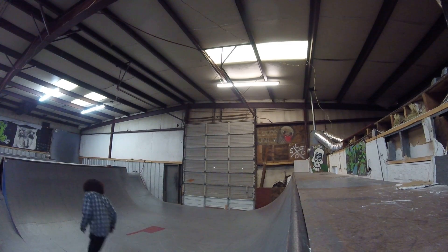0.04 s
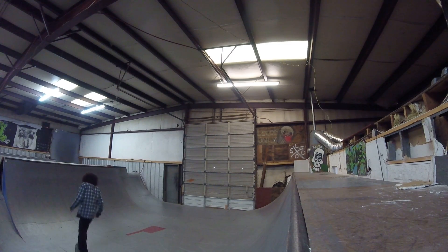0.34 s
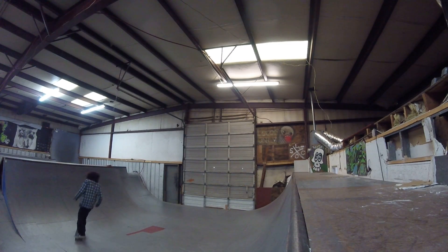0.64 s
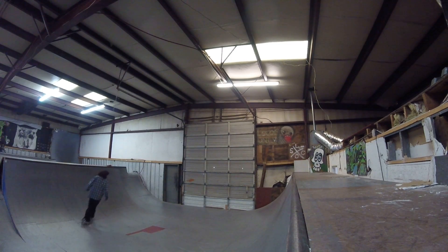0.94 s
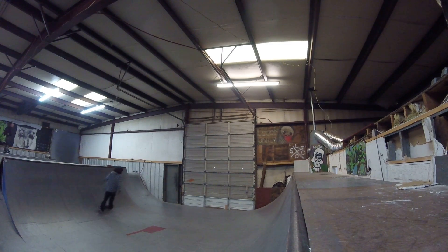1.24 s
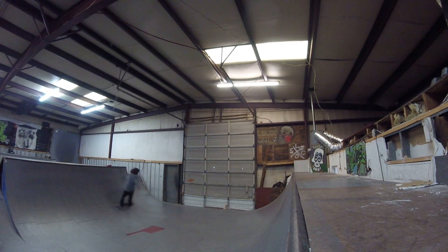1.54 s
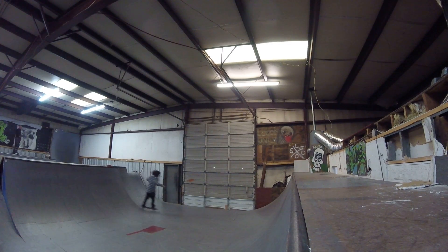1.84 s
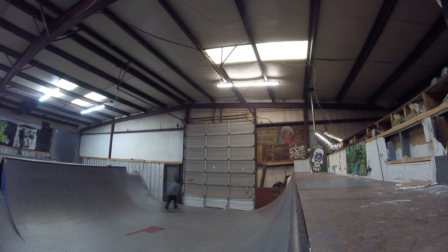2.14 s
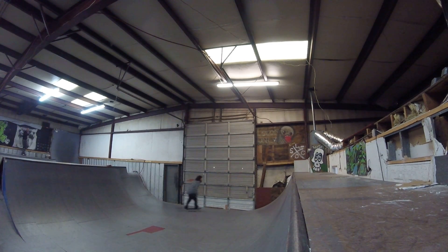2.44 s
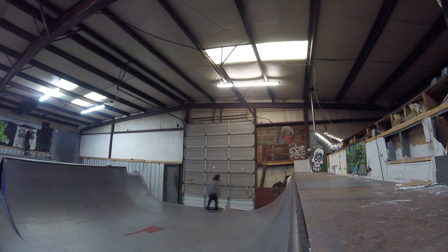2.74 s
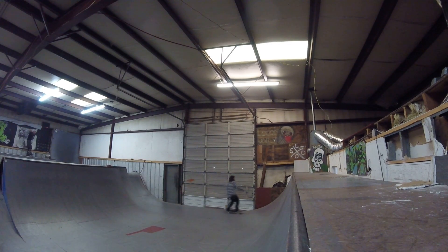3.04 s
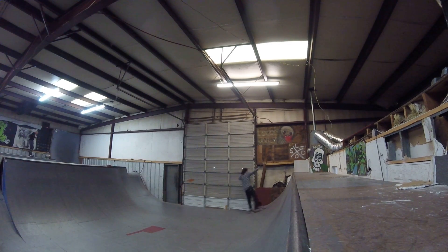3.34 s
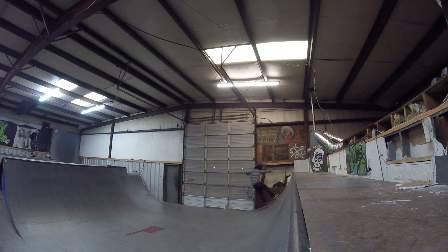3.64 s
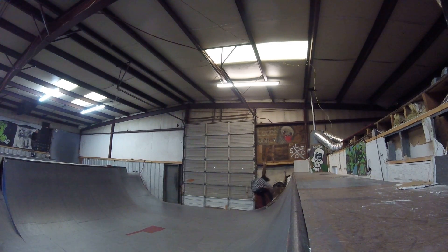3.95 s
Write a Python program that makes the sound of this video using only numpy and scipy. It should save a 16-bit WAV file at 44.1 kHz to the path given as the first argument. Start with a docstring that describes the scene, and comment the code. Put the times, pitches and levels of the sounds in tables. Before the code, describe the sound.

A skateboard rolls on a hollow wooden ramp in an echoing hall, its low rumble strongest at the start, with gritty wheels, faint bearing hiss and soft thuds. At about 2 seconds the board slaps down loudly and the wood booms. From 3 seconds come more knocks, light metallic ticks and two tiny squeaks, while the ramp's drone swells around 3.5 seconds and fades by 4.

```python
"""A steel-roofed hall, where a skateboard rolls across a hollow wooden ramp.
The wheels grind over grit, their bearings hiss, and the ramp rumbles and booms underneath.
Panel seams thud, rough spots clack, and the plywood thumps as it flexes under the rider.
Halfway the board slaps down on the floor, and deck, ramp and hall ring. On the way up
the far slope the curved plywood drones, the trucks tick and their bushings squeak."""
import sys
import numpy as np
from scipy import signal
from scipy.fft import rfft, irfft
from scipy.io import wavfile

SR = 44100
rng = np.random.default_rng(int(sys.argv[2]) if len(sys.argv) > 2 else 0)


def materialize(psi):
    """Save the field psi as 16-bit PCM at rate SR to the path in sys.argv[1].

    A 1-D psi becomes a single channel; in a 2-D psi each row is a channel.
    """
    bounded = np.clip(np.atleast_2d(psi).T, -1, 1)
    quanta = np.round(bounded * 32767).astype(np.int16)
    wavfile.write(sys.argv[1], SR, quanta)


N = 176400


def from_db(db):
    """Decibels to gain."""
    return 10 ** (np.asarray(db) / 20)


def rms_one(x):
    """Scale to rms 1."""
    return x / np.sqrt(np.mean(x ** 2) + 1e-20)


def fader(rows):
    """Gain over time from (time_s, level_db) points."""
    return from_db(np.interp(np.arange(N) / SR, *np.transpose(rows)))


def at_hz(points, hz):
    """Read a table on a log-frequency axis."""
    freqs, values = np.transpose(points)
    return np.interp(np.log(np.maximum(hz, 1)), np.log(freqs), values)


def eq(x, points):
    """Minimum-phase EQ with the given curve, scaled to unit power gain."""
    size = 2 * N
    gain = rms_one(from_db(at_hz(points, np.arange(N + 1) * SR / size)))
    cepstrum = irfft(np.log(gain))[:N]
    cepstrum[1:] *= 2
    return irfft(rfft(x, size) * np.exp(rfft(cepstrum, size)))[:N]


def drift(rate_hz):
    """Slow random modulation with a spread of 1."""
    hop, settle = 40, 2000
    pole = np.exp(-2 * np.pi * rate_hz * hop / SR)
    noise = rng.standard_normal(N // hop + settle + 2)
    slow = signal.lfilter([1], [1, -2 * pole, pole * pole], noise)[settle:]
    return np.interp(np.arange(N) / hop, np.arange(len(slow)), rms_one(slow))


def grains(per_s, spread_db):
    """Random clicks of uneven size, rms 1."""
    sizes = from_db(spread_db * np.minimum(rng.exponential(1, N), 4))
    signs = rng.choice([-1, 1], N)
    return rms_one(sizes * signs * (rng.random(N) < per_s / SR))


def crack(t60_s, rise_s):
    """A fast-dying noise burst of unit energy."""
    t = np.arange(1, SR // 4) / SR
    burst = rng.standard_normal(len(t)) * from_db(-60 * t / t60_s) * (1 - np.exp(-t / rise_s))
    return burst / np.linalg.norm(burst)


def ringing(start_s, hz, db, t60_s, rise_s):
    """A struck mode that swells briefly and dies away."""
    t = np.maximum(np.arange(N) / SR - start_s, 0)
    attack = 1 - np.exp(-(t / rise_s) ** 2)
    return attack * from_db(db - 60 * t / t60_s) * np.sin(2 * np.pi * hz * t)


def hits(cues, one_shot):
    """Trigger a fresh one-shot at each cue's time and level."""
    track = np.zeros(N + 2 * SR)
    for start_s, db, *_ in cues:
        sound, start = one_shot(), int(start_s * SR)
        track[start:start + len(sound)] += from_db(db) * sound
    return track[:N]


# Reverb decay of the hall: freq_hz, t60_s
HALL_DECAY = [(100, 1), (400, 0.74), (900, 0.6), (1600, 1.03), (3000, 1.24), (5500, 1.2), (8000, 0.63),
              (12000, 0.58)]

def hall_response():
    """Diffuse echoes that build up briefly and die at their own rate in each band; unit energy."""
    t, hz = np.arange(SR) / SR, np.arange(SR // 2 + 1)
    white, tail = rfft(rng.standard_normal(SR)), 0
    for band_hz, t60_s in HALL_DECAY:
        band = at_hz([(f, f == band_hz) for f, _ in HALL_DECAY], hz)
        tail += irfft(white * band) * from_db(-60 * t / t60_s)
    tail *= 1 - np.exp(-t / 0.0081)
    return tail / np.linalg.norm(tail)


def in_hall(x, hall, wet_db):
    """Direct sound plus its reverb."""
    return x + from_db(wet_db) * signal.fftconvolve(x, hall)[:N]


# Tone of the hall's air: freq_hz, gain_db
AIR_EQ = [(30, 1.5), (150, -30.5), (600, -21), (3000, -25.5), (7000, -26.5), (10000, -42.5), (14000, -52)]

def room_tone():
    """The still air of the hall, a faint bed of noise."""
    return from_db(-52.5) * eq(rng.standard_normal(N), AIR_EQ)


# Fader ride of the grind: time_s, level_db
GRIND_FADER = [(0, -35.5), (.14, -41.5), (.4, -44.5), (.7, -45.5), (.84, -41.5), (1.05, -41.5),
               (1.3, -44.5), (1.55, -45.5), (1.6, -42.5), (1.69, -42), (1.78, -44), (1.94, -44.5),
               (2.35, -50.5), (2.55, -43), (2.85, -45.5), (3.1, -46), (3.35, -39), (3.55, -44), (3.72, -49),
               (3.82, -55.5), (4, -56)]
# Tone of the wheels: freq_hz, gain_db
WHEEL_EQ = [(150, -34.5), (300, 6), (520, 0), (1000, -2), (1500, -4), (2200, -8.5), (3100, -12),
            (4200, -26.5), (8000, -48.5)]

def wheel_grind(hall):
    """Grit crushed under the wheels over a smooth grind whose level flutters."""
    grit = 0.48 * in_hall(grains(per_s=900, spread_db=2), hall, wet_db=-4)
    smooth = rng.standard_normal(N) / 2
    flutter = from_db(1.45 * drift(rate_hz=10.6))
    return rms_one(eq(grit + smooth, WHEEL_EQ)) * fader(GRIND_FADER) * flutter


# Fader ride of the bearings: time_s, level_db
BEARING_FADER = [(0, -43), (.2, -53), (.6, -60), (.95, -55), (1.14, -51), (1.25, -57.5), (1.45, -56.5),
                 (1.7, -52.5), (1.94, -57.5), (2.4, -67), (2.72, -51.5), (3, -68.5), (3.15, -51.5),
                 (3.68, -74), (3.82, -77), (4, -59)]
# Their bright tone: freq_hz, gain_db
BEARING_EQ = [(2000, -4), (3500, -2), (5300, -1.5), (6200, -3.5), (6550, 3), (7000, -9.5), (9000, -18),
              (10700, -37.5), (14000, -33.5)]

def bearing_hiss():
    """Balls rattle in the hissing bearings."""
    rattle = 0.6 * grains(per_s=250, spread_db=3)
    hiss = rng.standard_normal(N)
    return rms_one(eq(rattle + hiss, BEARING_EQ)) * fader(BEARING_FADER)


# Fader ride of the panels under the rider's weight: time_s, level_db
RUMBLE_FADER = [(0, -20), (.25, -30), (.45, -32), (.68, -41), (.9, -33.5), (1.06, -25), (1.2, -31.5),
                (1.4, -28.5), (1.9, -34.5), (2.3, -33), (2.85, -32.5), (3.2, -24), (3.5, -29), (3.8, -30.5),
                (4, -41.5)]
# Their bass-heavy tone: freq_hz, gain_db
RUMBLE_EQ = [(25, -22.5), (42, -14), (62, -6.5), (79, 1.5), (98, 3), (135, -12), (165, -10), (215, -13.5),
             (260, -20), (305, -16.5), (370, -21), (450, -26.5), (1500, -71.5)]

def ramp_rumble():
    """Bumps shake the ramp's panels into a rumble."""
    bumps = grains(per_s=500, spread_db=1)
    return rms_one(eq(bumps, RUMBLE_EQ)) * fader(RUMBLE_FADER)


BOOM_HZ = 54.46
# Swells of the ramp's lowest mode: time_s, level_db
BOOM_FADER = [(0, -14.5), (.21, -27.5), (.4, -26), (.55, -22.5), (.8, -41.5), (1.09, -22), (1.3, -54),
              (1.9, -41), (2.56, -38), (2.8, -26.5), (3.07, -23.5), (3.2, -28), (3.28, -35), (3.38, -22),
              (3.52, -30.5), (4, -35.5)]

def ramp_boom():
    """The hollow ramp hums at its lowest mode, wavering in pitch and level."""
    pitch_hz = BOOM_HZ + 1.156 * drift(rate_hz=4.1)
    hum = np.sin(2 * np.pi * np.cumsum(pitch_hz) / SR)
    flutter = from_db(1.5 * drift(rate_hz=4.4))
    return rms_one(hum) * fader(BOOM_FADER) * flutter


# Wheels knocking on panels, mostly at seams: start_s, relative_db, pitch_hz
SEAM_CUES = [(.004, -22.5, 367), (0.098, -27.5, 369), (.307, -32, 256), (.719, -30.5, 213),
             (0.908, -33, 304), (.97, -30, 234), (1.252, -30.5, 297), (1.275, -32, 291),
             (1.645, -31.5, 219), (1.972, -23.5, 291), (2.553, -32.5, 402), (2.919, -30, 378),
             (2.968, -29, 383), (3.072, -27, 370), (3.113, -22, 371), (3.166, -22, 393),
             (3.276, -21.5, 326), (3.288, -19.5, 383.5), (3.503, -24, 393.5), (3.657, -29.5, 387)]
# Tone of a thud: freq_hz, gain_db
THUD_EQ = [(60, 4.5), (120, -19), (230, -11), (300, 3), (470, -2), (750, -11.5), (1500, -23.5), (4000, -32),
           (9000, -79.5)]

def seam_thuds(hall):
    """Wheels cross a seam or touch down: a dull thud plus the hollow note of the panel."""
    knocks = hits(SEAM_CUES, lambda: crack(t60_s=0.062, rise_s=0.0051))
    thuds = from_db(20.5) * eq(knocks, THUD_EQ)
    notes = sum(ringing(start_s, hz, db + 0.5, t60_s=0.15, rise_s=0.0051)
                for start_s, db, hz in SEAM_CUES)
    return in_hall(thuds, hall, wet_db=-5) + notes


# Ticks of the hardware: start_s, relative_db
TICK_CUES = [(.097, -39), (.312, -40.5), (.35, -45), (1.41, -44), (2.8667, -41.5), (2.931, -37.5),
             (3.065, -38), (3.078, -33), (3.174, -31.5), (3.291, -35), (3.3546, -39), (3.5003, -36.5),
             (3.6474, -39.5), (3.925, -46)]
# Their metallic tone: freq_hz, gain_db
TICK_EQ = [(400, -12), (1200, 11), (2500, -3.5), (4000, -6.5), (5400, 2.5), (6000, -0.5), (6550, 5),
           (7300, -9), (9500, -18), (13000, -43)]

def truck_ticks(hall):
    """Trucks and bearings give short metallic ticks."""
    bursts = hits(TICK_CUES, lambda: crack(t60_s=0.056, rise_s=0.0012))
    return in_hall(from_db(20) * eq(bursts, TICK_EQ), hall, wet_db=-2.5)


# Wheels hitting rough spots: start_s, relative_db
CLACK_CUES = [(1.279, -36), (1.396, -37), (1.612, -40.5), (1.717, -51.5), (1.828, -34)]

def wheel_clacks(hall):
    """Small hard clacks of the wheels on the way down the curve."""
    bursts = hits(CLACK_CUES, lambda: crack(t60_s=0.056, rise_s=0.0012))
    return in_hall(from_db(20) * eq(bursts, WHEEL_EQ), hall, wet_db=-2.5)


# Panels flexing: start_s, level_db, pitch_hz
FLEX_CUES = [(1.975, -6, 85), (2.691, -17.5, 84.5), (3.191, -7, 76.7), (3.352, -11.5, 79),
             (3.665, -7, 106.7)]

def panel_thumps():
    """Deep, soft thumps of the plywood giving under the rider's weight."""
    return sum(ringing(start_s, hz, db, t60_s=0.26, rise_s=0.012) for start_s, db, hz in FLEX_CUES)


# Tail and wheels striking the floor: start_s, relative_db
SLAP_CUES = [(1.977, -7), (1.988, -8), (1.996, -9.5), (2.0095, -3.5), (2.0135, -1), (2.0235, 0.5),
             (2.035, -4.5), (2.046, -5.5)]
# Tone of a slap: freq_hz, gain_db
SLAP_EQ = [(40, -2), (85, 1), (130, -10.5), (220, 12.5), (400, 0), (760, 1), (1050, 2.5), (1300, 1.5),
           (1520, 3.5), (1800, -2.5), (2700, -2.5), (4200, -11.5), (5500, -9), (7000, -15.5), (9000, -25.5),
           (13000, -58)]
# Ring-out of deck and ramp: pitch_hz, level_db, t60_s
WOOD_MODES = [(88.1, -18.5, 1), (113, -19, 0.4), (170.8, -17.5, 0.32), (218.3, -18, 0.48), (310, -23, 0.35),
              (564, -32, .45), (961, -29, 0.41), (1107, -30.5, .3), (1510, -27, 0.23), (1610, -36, 0.74),
              (2025, -26, 0.11)]

def landing():
    """Tail and wheels crack down in a flurry, each with its own reverb; the wood rings and booms."""
    cracks = hits(SLAP_CUES, lambda: crack(t60_s=0.047, rise_s=0.00036))
    reverb = from_db(-2) * hits(SLAP_CUES, hall_response)
    slaps = from_db(8) * eq(cracks + reverb, SLAP_EQ)
    start_s = 2.012
    ring = sum(ringing(start_s, hz, db, t60_s, rise_s=0.0024) for hz, db, t60_s in WOOD_MODES)
    boom = ringing(start_s, BOOM_HZ, db=-3.5, t60_s=1, rise_s=0.085)
    return slaps + ring + boom


# Fader ride of the climb up the far slope: time_s, level_db
SLOPE_FADER = [(2.8, -83), (2.95, -33.5), (3.2, -31), (3.5, -22), (3.7, -27.5), (3.8, -37), (4, -55)]
# Resonances of its plywood: pitch_hz, width_hz, relative_db
SLOPE_RESONANCES = [(117, 9.2, 4.5), (161.2, 5.2, -1.5), (378, 48, -23)]

def slope_drone():
    """The curved plywood of the far slope drones at its own resonances under the wheels."""
    bumps, drone = grains(per_s=500, spread_db=6), 0
    for hz, width_hz, db in SLOPE_RESONANCES:
        radius = np.exp(-np.pi * width_hz / SR)
        feedback = [1, -2 * radius * np.cos(2 * np.pi * hz / SR), radius ** 2]
        drone += from_db(db) * rms_one(signal.lfilter([1, 0, -1], feedback, bumps))
    band_pass = signal.butter(2, [80, 600], "band", fs=SR, output="sos")
    return rms_one(signal.sosfilt(band_pass, drone)) * fader(SLOPE_FADER)


# Squeaks of the bushings: start_s, relative_db
SQUEAK_CUES = [(2.979, -36), (3.121, -36)]

def bushing_squeaks(hall):
    """The bushings squeak twice: very short bursts through one high EQ peak."""
    centre_hz, step_oct = 3320, 0.27
    peak = [(centre_hz * 2 ** (k * step_oct), -5 * k * k) for k in range(-3, 4)]
    bursts = hits(SQUEAK_CUES, lambda: crack(t60_s=0.015, rise_s=0.0011))
    return in_hall(from_db(18) * eq(bursts, peak), hall, wet_db=-2.5)


def scene():
    """Mono mix of hall, board and ramp."""
    hall = hall_response()
    bed = room_tone() + wheel_grind(hall) + bearing_hiss() + ramp_rumble() + ramp_boom()
    impacts = seam_thuds(hall) + truck_ticks(hall) + wheel_clacks(hall) + panel_thumps() + landing()
    climb = slope_drone() + bushing_squeaks(hall)
    return (bed + impacts + climb)[None]


def record(dry):
    """A soft clipper rounds the peaks and a steep low-pass cuts the top."""
    ceiling, stop_hz = 0.7, 14300
    rounded = ceiling * np.tanh(dry / ceiling)
    return signal.sosfilt(signal.cheby2(12, 70, stop_hz, fs=SR, output="sos"), rounded)


dry = scene()
out = record(dry)
materialize(out)
```